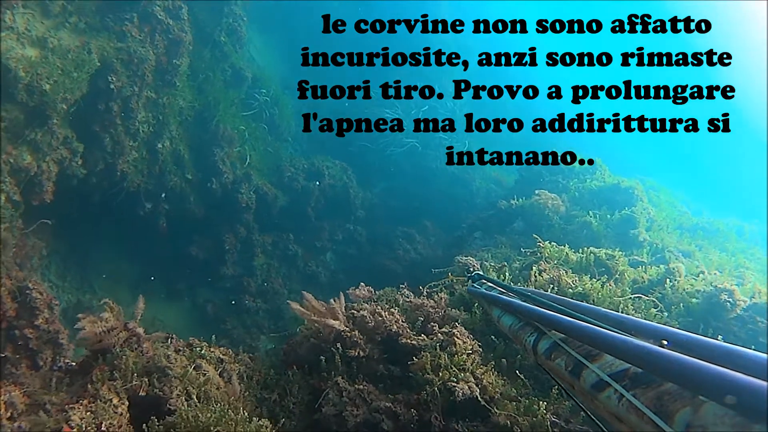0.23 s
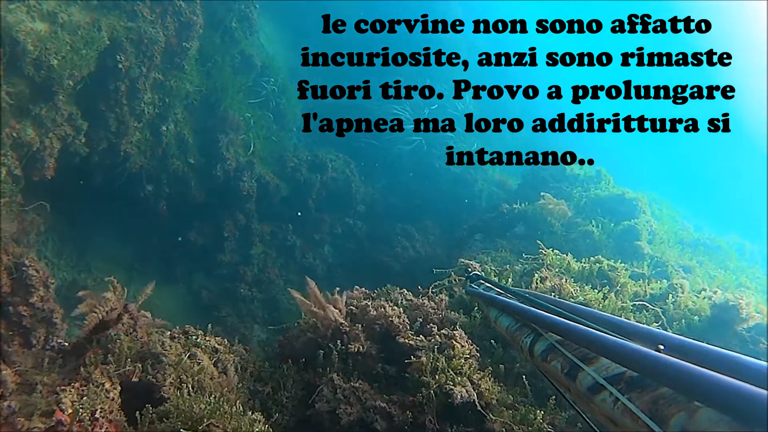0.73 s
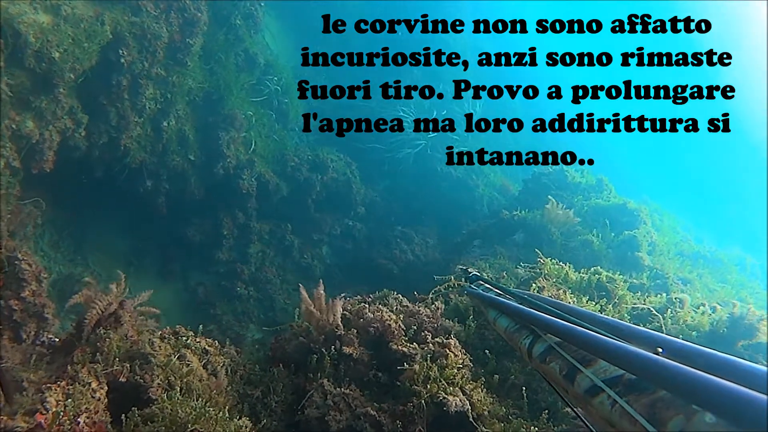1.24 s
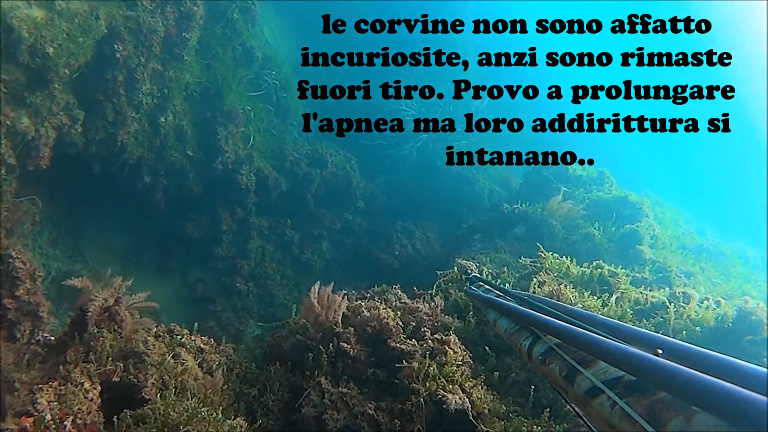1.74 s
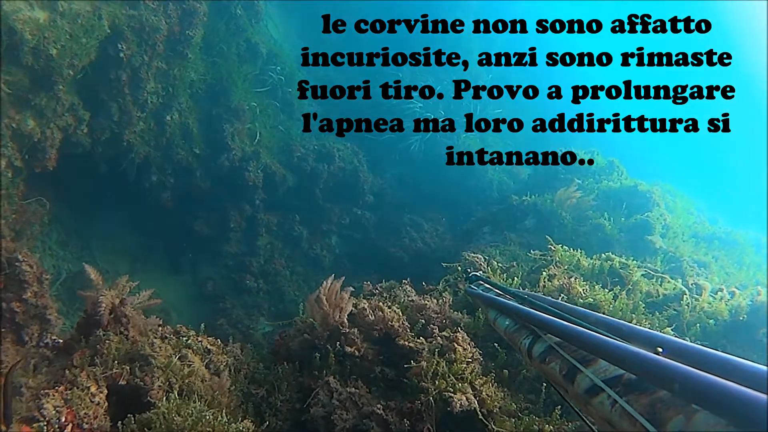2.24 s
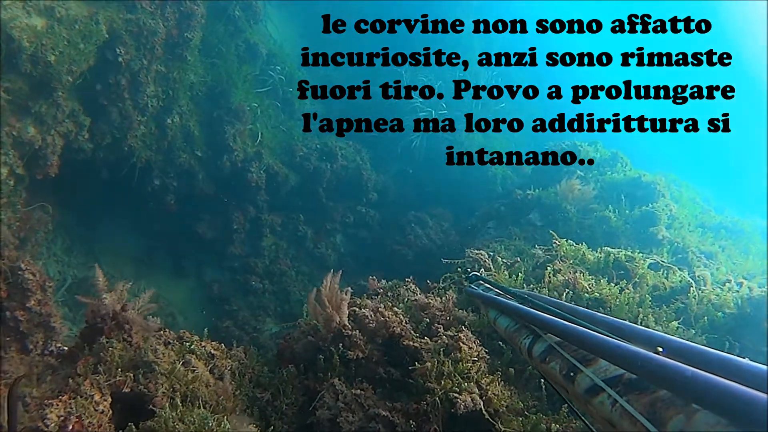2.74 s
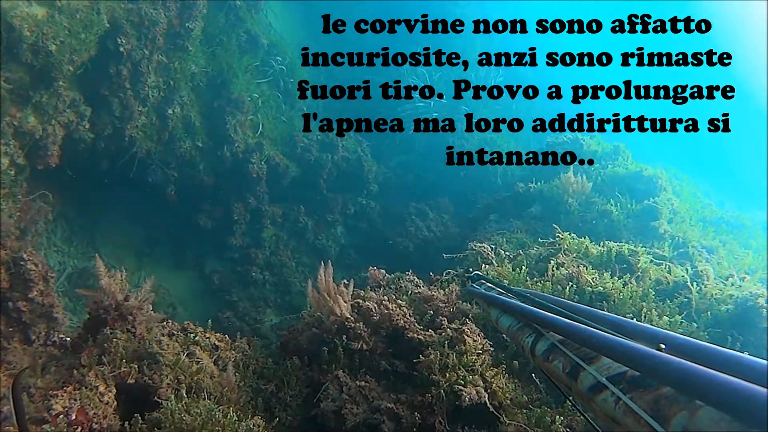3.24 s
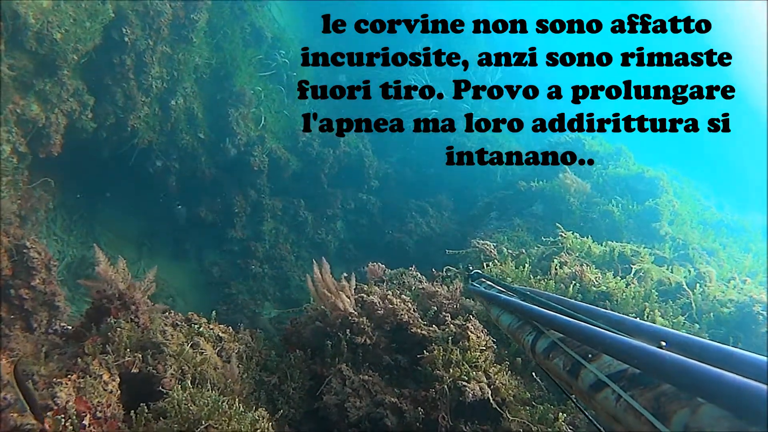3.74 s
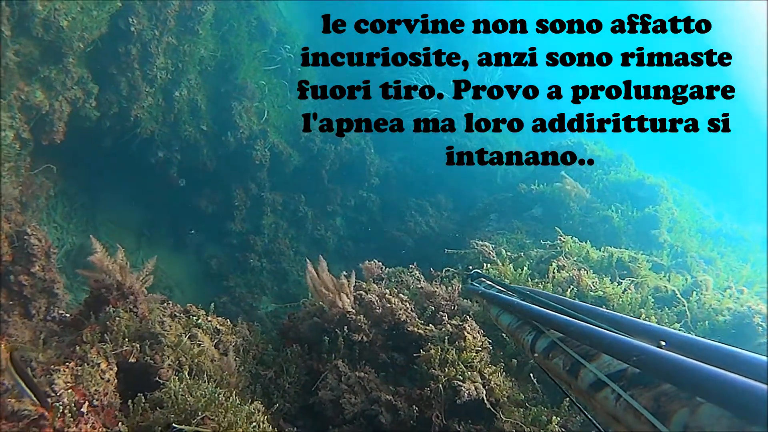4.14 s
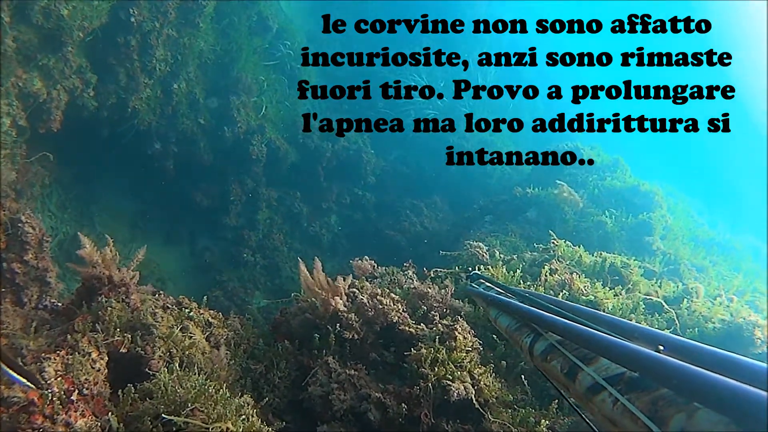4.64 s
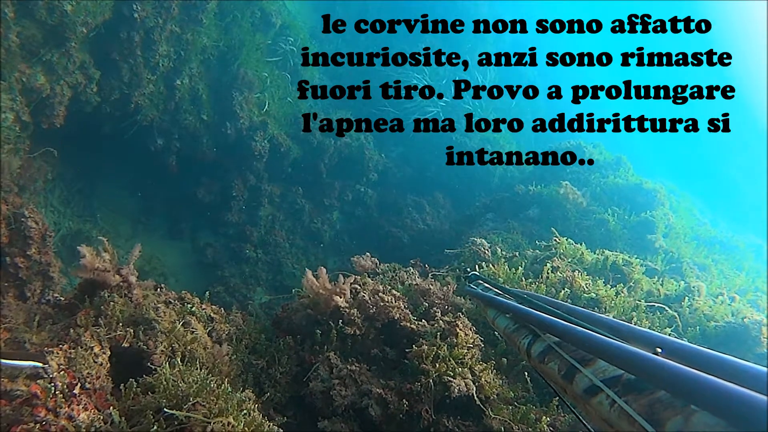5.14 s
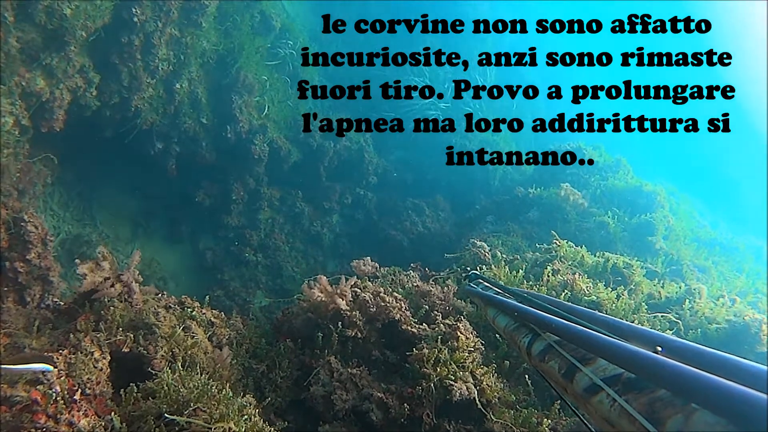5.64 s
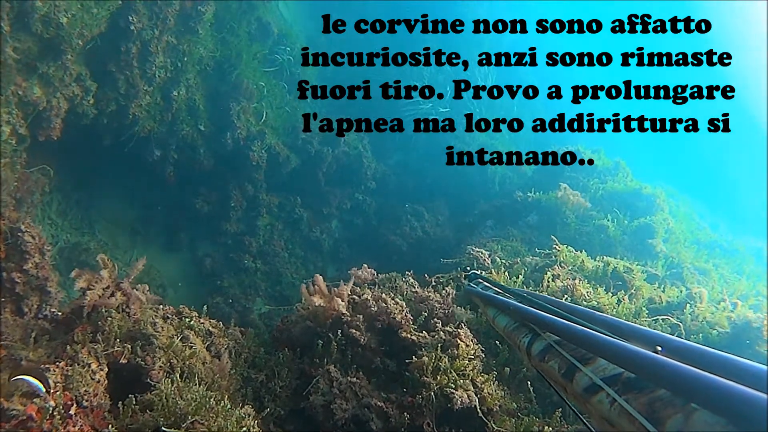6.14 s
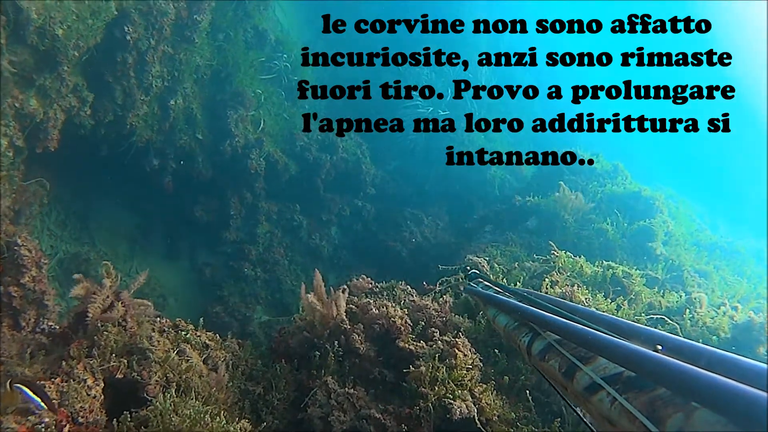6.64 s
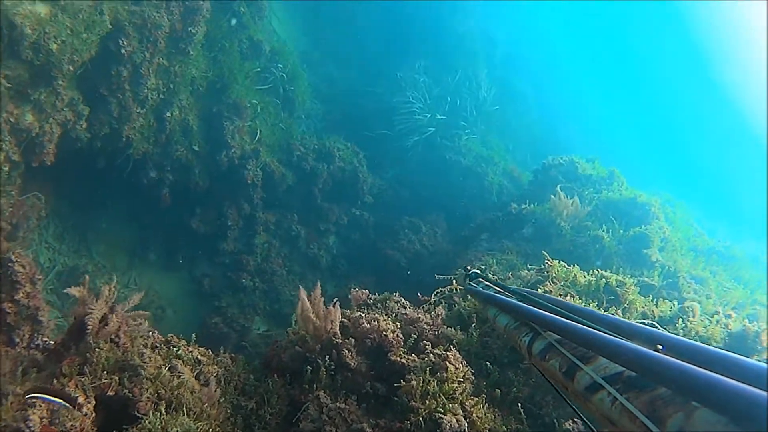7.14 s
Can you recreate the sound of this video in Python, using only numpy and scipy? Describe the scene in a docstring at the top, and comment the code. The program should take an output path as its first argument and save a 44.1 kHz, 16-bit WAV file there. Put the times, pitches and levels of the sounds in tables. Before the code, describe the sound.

Snapping shrimp tick and crackle continuously around a submerged camera case, near clicks standing out from a distant hiss, with quiet bumps and gritty crunches.

```python
"""A fine hiss and crackle over a faint wash: under water at a rocky reef, inside a waterproof camera housing.
Snapping shrimp collapse bubbles: near ones tick sharply, far ones merge into a hiss, and every snap rings the case.
Wash and faint pats are shaped noise and struck filters; knocks and gulps are short pushes of water on the case.
Dull crunches, like grit shifting, are bursts of band-limited grains."""
import sys
import numpy as np
from scipy import signal
from scipy.fft import rfft, irfft
from scipy.io import wavfile
from scipy.ndimage import uniform_filter1d

SR = 44100
rng = np.random.default_rng(int(sys.argv[2]) if len(sys.argv) > 2 else 0)


def unload_wav(signal):
    """Save mono or channel-first audio to the path in sys.argv[1] as 16-bit WAV at rate SR, clipped to [-1, 1]."""
    wavfile.write(
        sys.argv[1],
        SR,
        np.round(np.clip(np.atleast_2d(signal).T, -1, 1) * 32767).astype(np.int16),
    )


N = 325458
FREQ = np.maximum(np.arange(N // 2 + 1) * SR / N, 1)  # Hz, kept above zero for the logarithms


def undb(db):
    """Decibels to gain."""
    return 10 ** (np.asarray(db) / 20)


def level(x, db):
    """Set the rms level."""
    return x * undb(db) / np.sqrt(np.mean(x ** 2))


def curve(points):
    """Join (Hz, dB) points on a log-frequency axis."""
    hz, db = np.transpose(points)
    return np.interp(np.log(FREQ), np.log(hz), db)


def causal(db):
    """Frequency response with this gain that rings only after it is struck (minimum phase)."""
    cepstrum = irfft(db * np.log(10) / 20, N)
    return np.exp(rfft(2 * cepstrum * (np.arange(N) < N // 2)) - cepstrum[0])


def walk(rate):
    """Random drift that slides to a new value every 1 / rate s, scaled to a spread of 1."""
    hold = max(int(SR / rate), 1)
    steps = np.repeat(rng.standard_normal(N // hold + 1), hold)
    drift = uniform_filter1d(steps, hold)[:N]
    return drift / drift.std()


def pulses(s, size):
    """Spectrum of a train of single pressure spikes."""
    return rfft(np.bincount((s * SR).astype(int) % N, size, N))


# broad slope of sound through the housing: pitch_hz [Hz], gain_db [dB]
WALL_SLOPE = [(100, -40.5), (300, -32.5), (520, -29), (900, -35), (1900, -26.5), (3000, -21), (4000, -13.5),
              (4700, -8), (5500, -12), (6500, -21.5), (8700, -28), (11000, -30.5)]
# wall resonances on top of that slope: pitch_hz [Hz], width_hz [Hz], height_db [dB]
WALL_MODES = [(582.7, 120, 11.9), (1154, 155, 10.9), (1490, 300, 12.4), (2390, 250, 9.15), (4174, 133, 4.6),
              (4682, 466, 6.64), (7566, 740, 9.9)]


def housing():
    """Response of the case: wall resonances on a broad slope; a unit spike rings it to a peak of 1."""
    gain_db = curve(WALL_SLOPE)
    for hz, width, height_db in WALL_MODES:
        gain_db = gain_db + height_db / (1 + (2 * (FREQ - hz) / width) ** 2)
    response = causal(gain_db)
    return response / np.abs(irfft(response, N)).max()


# gain on wall motion that reaches the two microphones in opposite phase: pitch_hz [Hz], gain_db [dB]
ROCKING = [(30, -28), (120, -6), (560, -5), (950, 4.5), (1500, -2.5), (1950, 2.5), (2400, -8.5),
           (3000, 0.5), (4600, -22.5), (6000, -14), (6800, 6.5), (7500, -18), (8400, -1.5), (11000, -12)]
# how the case's resonances favour one microphone: pitch_hz [Hz], left_minus_right_db [dB]
BALANCE = [(500, 0), (690, -3.5), (1030, 3), (1250, -2.2), (1650, -1.5), (1900, 1), (2250, -1.2),
           (2680, 6.5), (3400, -4.3), (3850, 2), (4300, -4), (4700, -0.5), (5800, -2), (6450, 1),
           (6900, -2.5), (7400, 0), (11000, -.8)]
RIGHT_LAG_S = .000018


def microphones(mid, side):
    """Spectra of common and rocking motion -> left and right sound; rocking shifts phase more than level."""
    rocking = 1j * side * undb(curve(ROCKING))
    lag = np.exp(-2j * np.pi * FREQ * RIGHT_LAG_S)
    favour = undb(curve(BALANCE) / 2)
    left = (mid + rocking) * favour
    right = (mid - rocking) * lag / favour
    return irfft(np.array([left, right]), N)


def far_hiss(case, db=-60, waver_db=1, top_db=3):
    """Countless distant snaps merge into a hiss: noise through the case, wavering in level."""
    colour = curve([(7500, 0.0043), (9500, top_db)])
    noise = rfft(rng.standard_normal((2, N))) * case * undb(colour)
    steady = level(microphones(*noise), db)
    return steady * undb(waver_db * walk(7.3))


# spectrum of the wash of water round the case: pitch_hz [Hz], gain_db [dB]
WASH_COLOUR = [(25, -2), (60, -6.5), (130, -6.5), (250, -7.5), (420, -4.5), (520, 0.5), (610, 1.5),
               (680, -9), (900, -11.5), (2000, -22.5)]


def wash(db=-66.5, flutter_db=1.0, swell_db=0.5, lean=0.72, spread=1.15):
    """Water stirring unevenly round the case: coloured noise with fast flutter and slow swell."""
    motion_db = flutter_db * walk(45) + swell_db * walk(5)
    noise = rng.standard_normal((2, N)) * undb(motion_db)
    mid, side = rfft(noise) * causal(curve(WASH_COLOUR))
    return level(microphones(mid, lean * mid + spread * side), db)


def lapping(case, db=-71.5, hz=470, octaves=0.46, range_db=24, rocking=0.33, count=200):
    """Many faint pats of water on the case: spikes softened to a low band, at random times and levels."""
    when, faintness = rng.random((count, 2)).T
    bell_db = -4 * (np.log2(FREQ / hz) / octaves) ** 2
    soft = causal(np.maximum(bell_db, -50))
    mid = pulses(when * N / SR, undb(-range_db * faintness)) * soft * case
    return level(microphones(mid, rocking * mid), db)


def colony(count=2500, nearest_db=-31.0, reach=9.34, colour_db=3.0, edge_db=0.74):
    """Shrimp spread evenly over the seabed snap at random; each snap falls off as 1 / distance."""
    area = (np.arange(count) + .5) / count
    distance = np.sqrt(1 + area * (reach ** 2 - 1))  # in units of the nearest
    when = rng.random(count)
    body, edge = colour_db * rng.standard_normal((count, 2)).T
    return np.array([when * N / SR, nearest_db - 20 * np.log10(distance), body, edge + edge_db])


# loudest snaps, from shrimp close by: claw_s [s], level_db [dB], body_db [dB], edge_db [dB]
# body and edge count only by how far each lies from the average of its column
NEAR_SNAPS = [(0.1024, -29, -40, -16), (0.1945, -25.5, -33, -41), (0.2386, -28, -20, -32),
              (0.3422, -30, -19, -22), (0.4467, -30.5, -16, -23), (0.597, -28.5, -29, -18),
              (0.6619, -33, -14, -19), (0.7311, -19, -31, -20.5), (0.9015, -25.5, -42, -29),
              (0.931, -29.5, -30, -22), (0.9453, -23, -28, -28), (0.9772, -25, -27.5, -23),
              (0.9887, -31, -23, -18), (1.098, -30.5, -27, -27), (1.1897, -29, -29, -20),
              (1.2171, -24.5, -28, -28), (1.226, -30.5, -32, -21), (1.3752, -32, -29, -25),
              (1.3976, -23, -32, -37), (1.5469, -27.5, -24.5, -22.5), (1.5592, -26, -23, -24),
              (1.7384, -29, -22, -23.5), (1.7845, -30.5, -29, -24), (1.8068, -25.5, -25, -26),
              (1.8703, -25, -26, -31), (1.894, -26.5, -26, -27), (1.9294, -27, -25, -25),
              (2.015, -28.5, -20, -30), (2.1054, -30.5, -35, -25), (2.1727, -28.5, -26, -39),
              (2.2563, -34.5, -11, -17), (2.3559, -28.5, -25, -33), (2.612, -23, -27.5, -36),
              (2.6801, -20, -22.5, -29), (2.7442, -19, -34, -38), (2.7917, -29, -20.5, -20),
              (2.7976, -25, -34, -27), (3.1246, -28, -31, -26), (3.2093, -28.5, -37, -17),
              (3.7105, -26.5, -28, -20.5), (3.7471, -28, -29, -22), (3.7821, -31.5, -27, -13.5),
              (3.926, -31, -15.5, -22), (3.952, -22, -21.5, -26), (4.146, -24, -22, -18.5),
              (4.2488, -27.5, -39, -20), (4.3059, -25, -28, -15), (4.5345, -30.5, -31, -22),
              (4.657, -29, -20.5, -31), (4.944, -28, -24, -21), (5.0953, -28, -33, -26),
              (5.1772, -28.5, -33, -23), (5.3763, -29, -49, -14), (5.5426, -28.5, -20.5, -22),
              (5.5572, -29.5, -33, -27), (5.7899, -21.5, -39, -35), (5.8113, -29.5, -34, -24),
              (6.0483, -27.5, -36, -29), (6.2464, -26, -30, -29), (6.437, -24.5, -33, -28),
              (6.4508, -28, -19.5, -14), (6.465, -20.5, -25, -18), (6.5244, -31, -33, -32),
              (6.6477, -31.5, -17.5, -13), (7.009, -29.5, -28, -30), (7.0936, -25.5, -33, -28),
              (7.1413, -26, -28, -18.5), (7.222, -34.5, -26, -15)]
COLLAPSE_S = .0006  # from the closing of the claw to the collapse of its bubble


def near_shrimp(body_db=-5, edge_db=-3.0):
    """The sharp ticks from the rocks close by, each with its own fullness and brightness."""
    claw_s, db, body, edge = np.transpose(NEAR_SNAPS)
    return np.array([claw_s + COLLAPSE_S, db, body - body.mean() + body_db, edge - edge.mean() + edge_db])


# centres of the bands in which the case is driven: pitch_hz [Hz]
BAND_HZ = [900, 1500, 2300, 3000, 3800, 4700, 5600, 6500, 7500, 8800, 10500]
# reach of a snap's body, edge and chance colour into each band: pitch_hz [Hz], body [0-1], edge [0-1], chance [0-1]
BAND_SHARE = [(2600, 1, 0, 1), (3800, .2, 0, .8), (4700, 0, 0, .2), (5600, 0, .2, .8), (6800, 0, 1, 1)]


def snaps(s, db, body_db, edge_db, ragged_db=4, bounce_db=-14, scatter_db=9, bounce_s=.0016,
          echo_db=-20, echo_s=.005):
    """Collapsing bubbles: a spike, a bounce off the shrimp's own rock, a later echo. Gives mid and side spectra."""
    late, echo = rng.random((len(s), 2)).T
    # each snap strikes the case from its own side, so it drives and rocks every band by a different amount
    drive, rock, bounce, soon = rng.uniform(-1, 1, (len(s), len(BAND_HZ), 4)).T
    share_hz, *shares = np.transpose(BAND_SHARE)
    unit = np.sqrt(3)  # brings a uniform -1..1 draw to a spread of 1
    out = 0
    for k, hz in enumerate(BAND_HZ):
        body, edge, chance = (np.interp(hz, share_hz, share) for share in shares)
        ragged = chance * ragged_db * unit * drive[k]
        gain = undb(db + body * body_db + edge * edge_db + ragged)
        # away from the main resonance the bounce is nearly as strong as the spike and frays the attack
        second = undb(bounce_db + chance * scatter_db) * unit * bounce[k]
        third = undb(echo_db) * 2 * echo
        times = np.concatenate([s, s + bounce_s * np.abs(soon[k]), s + echo_s * (.5 + late)])
        size = np.array([np.ones(len(s)), second, third]) * gain / np.hypot(1, second)
        mid = pulses(times, size.ravel())
        side = pulses(times, (size * unit * rock[k]).ravel())
        band = np.interp(FREQ, BAND_HZ, np.eye(len(BAND_HZ))[k])  # triangle that crossfades with its neighbours
        out = out + band * np.array([mid, side])
    return out


ROCK_DECAY_S = .004  # decay of the tail's energy


def rocks(direct, wet_db=-12):
    """The rough rock face scatters every snap into a short noisy tail of its own."""
    keep = np.exp(-1 / (ROCK_DECAY_S * SR))
    energy = signal.lfilter([1 - keep], [1, -keep], irfft(direct[0], N) ** 2)
    tail = np.sqrt(energy) * rng.standard_normal((2, N))
    return direct + undb(wet_db) * rfft(tail)


# spectrum of a snap as it meets the case: pitch_hz [Hz], gain_db [dB]
SNAP_COLOUR = [(500, -4), (1500, -4), (4700, 4), (7500, -2.5), (9500, -4.5)]


def crackle(case):
    """Near and far snaps, scattered by the rocks, coloured, and ringing the case."""
    shrimp = snaps(*np.hstack([near_shrimp(), colony()]))
    return microphones(*(rocks(shrimp) * causal(curve(SNAP_COLOUR)) * case))


def pushes(case, rows, cycles, rattle_db, rocking=0.48, rattle_s=0.009, size=8192):
    """Soft pushes that ring the case and leave a brief rattle; they decay over `cycles` of their pitch."""
    out, t = np.zeros(N + size), np.arange(size) / SR
    ring = irfft(case, N)[:size]
    for s, db, hz in rows:
        swell = t * np.exp(-t * hz / cycles)
        swing = np.sin(2 * np.pi * hz * t)
        push = swell * (swing - np.average(swing, weights=swell))  # the water flows back: no net push
        knock = signal.fftconvolve(push, ring)[:size]
        grain = rng.standard_normal(size) * np.sqrt(t) * np.exp(-t / rattle_s)
        rattle = signal.fftconvolve(knock, grain)[:size]
        sound = knock / np.abs(knock).max() + undb(rattle_db) * rattle / np.abs(rattle).max()
        start = int(s * SR)
        out[start:start + size] += undb(db) * sound
    mid = rfft(out[:N])
    return microphones(mid, rocking * mid)


# clearest knocks on the case: start_s [s], level_db [dB], pitch_hz [Hz]
KNOCKS = [(.495, -44.5, 405), (0.967, -57, 113), (1.023, -50.5, 335), (1.104, -42.5, 334),
          (1.342, -37.5, 550), (2.24, -40, 234), (2.251, -47.5, 500), (2.342, -49.5, 500),
          (3.446, -48.5, 405), (3.642, -38, 480), (4.237, -48.5, 580), (4.433, -47, 434), (4.96, -47, 366),
          (5.073, -50, 570), (5.196, -50.5, 438), (5.448, -51, 544), (5.850, -42.5, 416), (6.043, -49, 443),
          (6.516, -42, 520)]


def knocks(case):
    """Dull knocks: pushes that die within about a cycle, so the case's ring dominates."""
    return pushes(case, KNOCKS, cycles=0.43, rattle_db=-11.5)


# clear dull crunches, like grit shifting: start_s [s], level_db [dB]
CRUNCHES = [(0.5772, -50), (2.498, -48), (2.6815, -45.5), (2.9676, -45.5), (4.148, -55), (5.0722, -55),
            (5.3148, -55), (5.4874, -58), (6.2642, -54.5), (6.8153, -49.5)]
# each knock crunches too, relative to its own level; higher-pitched knocks more so
GRIT_DB, GRIT_DB_PER_OCTAVE = -10.5, 8.5


def grit(count=9, faint_db=-58):
    """When and how loudly grit shifts: clear crunches, one with every knock, and faint ones at random."""
    s, db, hz = np.transpose(KNOCKS)
    knocked_db = db + GRIT_DB + GRIT_DB_PER_OCTAVE * np.log2(hz / np.median(hz))
    knocked = np.column_stack([s, knocked_db])
    faint = np.column_stack([rng.random(count) * N / SR, np.full(count, faint_db)])
    return np.vstack([CRUNCHES, knocked, faint])


CRUNCH_HZ, CRUNCH_DECAY_S = 1360, 0.0073


def crunches(gain_db=-1.5, octaves=0.38, size=4096):
    """Bursts of grains so dense that they blur into one dull scrape."""
    lead = size // 32  # room for the band filter to ring ahead of each burst
    out, t = np.zeros((2, N + 2 * size)), np.arange(size) / SR
    freq = np.maximum(np.arange(size // 2 + 1) * SR / size, 1)
    band = np.exp(-.5 * (np.log2(freq / CRUNCH_HZ) / octaves) ** 2)
    for s, db in grit():
        grains = rng.standard_normal((2, size)) * np.exp(-t / CRUNCH_DECAY_S)
        burst = irfft(rfft(np.roll(grains, lead)) * band)
        start = int(s * SR)
        out[:, start:start + size] += undb(db + gain_db) * burst / np.abs(burst).max(axis=1, keepdims=True)
    return microphones(*rfft(out[:, lead:lead + N]))


# gulps of water that ring like bubbles: start_s [s], level_db [dB], pitch_hz [Hz]
GULPS = [(1.976, -42, 573), (2.006, -51, 500), (2.038, -56, 565), (5.934, -59, 1054)]


def gulps(case):
    """Pitched gulps: pushes that swing for a few cycles, with a strong rattle."""
    return pushes(case, GULPS, cycles=2.7, rattle_db=-2)


def scene():
    """Hiss, wash, pats, crackle, knocks, crunches and gulps, picked up by two microphones in the case."""
    case = housing()
    water = wash() + lapping(case)
    shrimp = far_hiss(case) + crackle(case)
    return shrimp + water + knocks(case) + crunches() + gulps(case)


TOP_HZ = 11000


def record(dry):
    """A steep elliptic low-pass: little is heard above 11 kHz."""
    return signal.sosfilt(signal.ellip(8, .2, 60, TOP_HZ, fs=SR, output="sos"), dry)


dry = scene()
out = record(dry)
unload_wav(out)
```